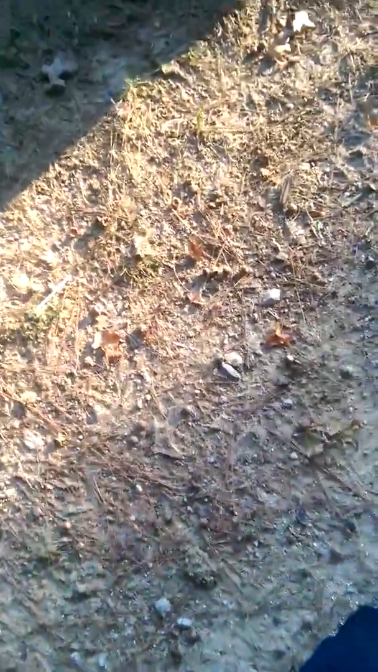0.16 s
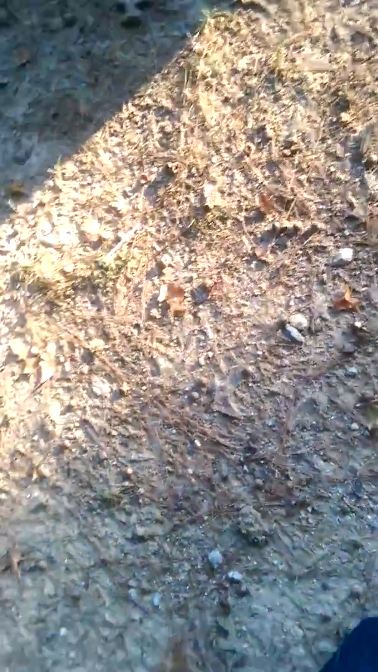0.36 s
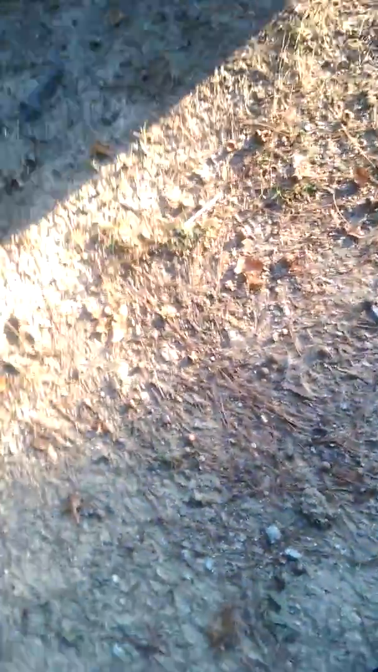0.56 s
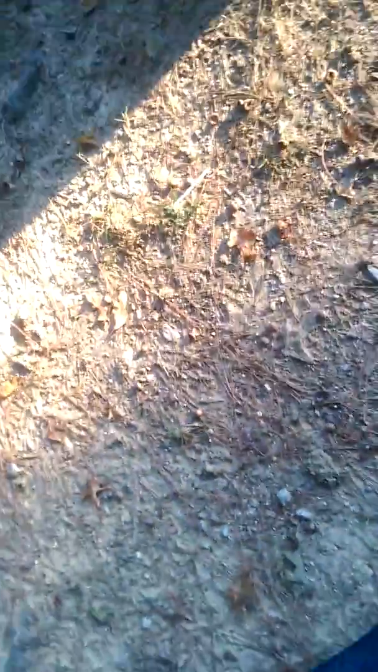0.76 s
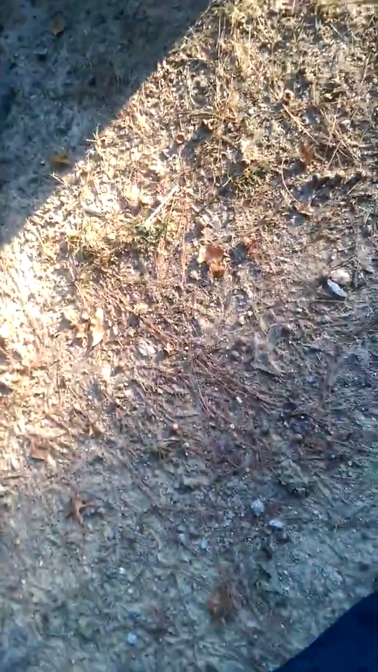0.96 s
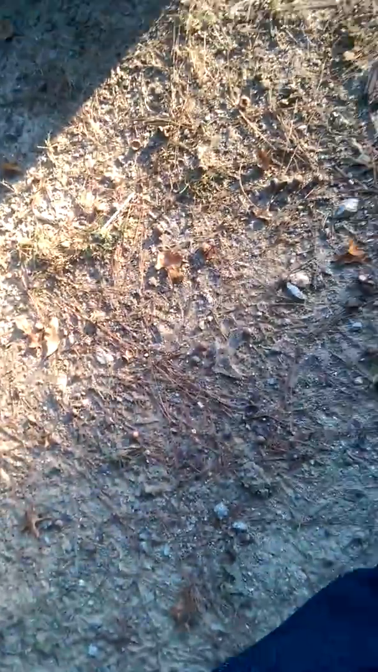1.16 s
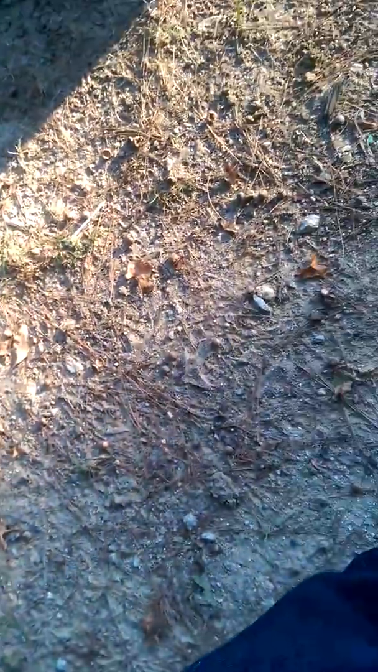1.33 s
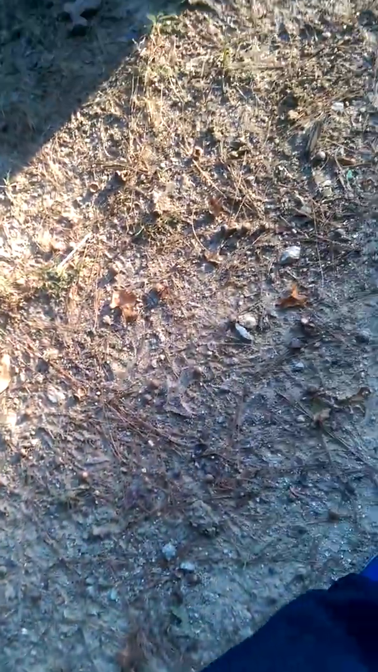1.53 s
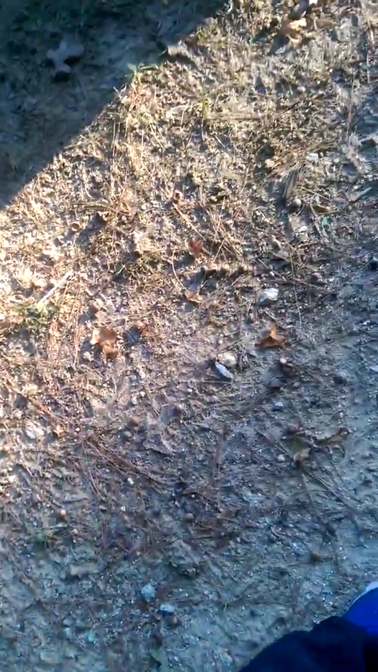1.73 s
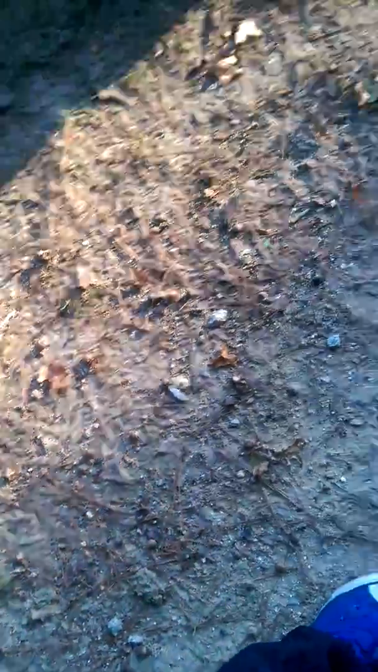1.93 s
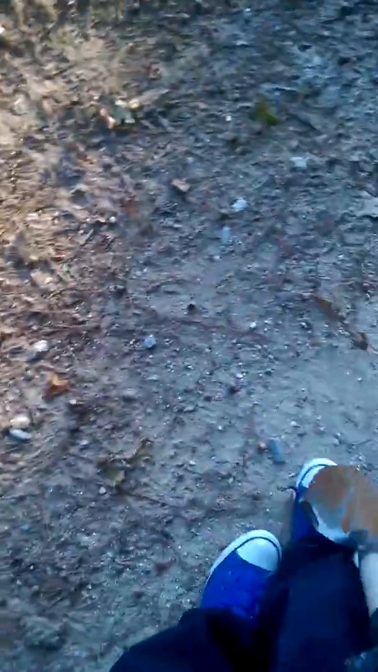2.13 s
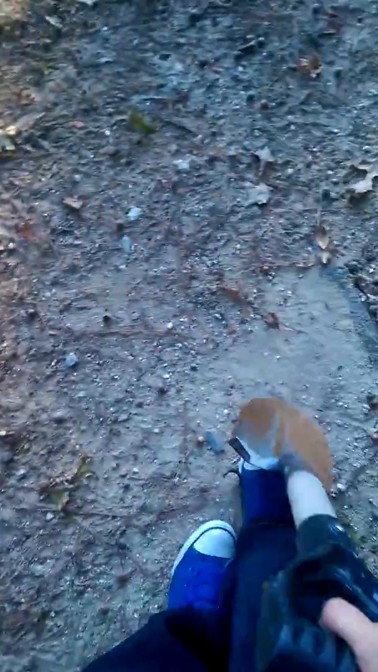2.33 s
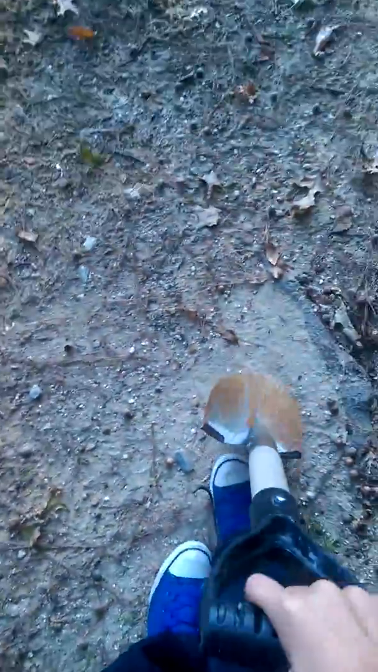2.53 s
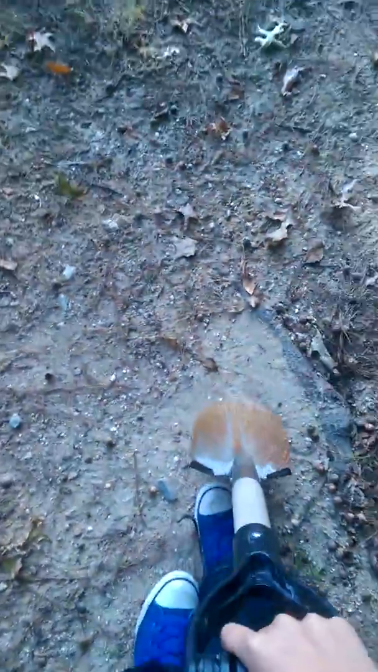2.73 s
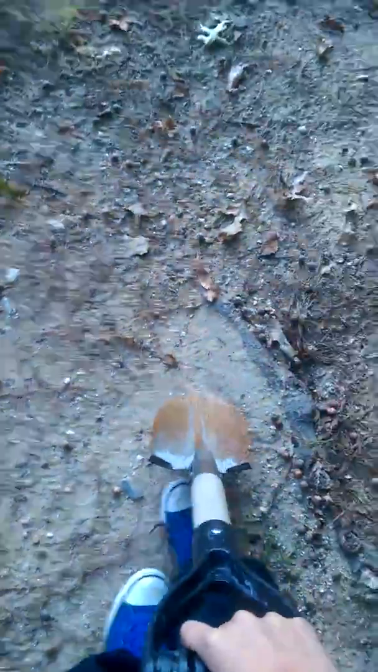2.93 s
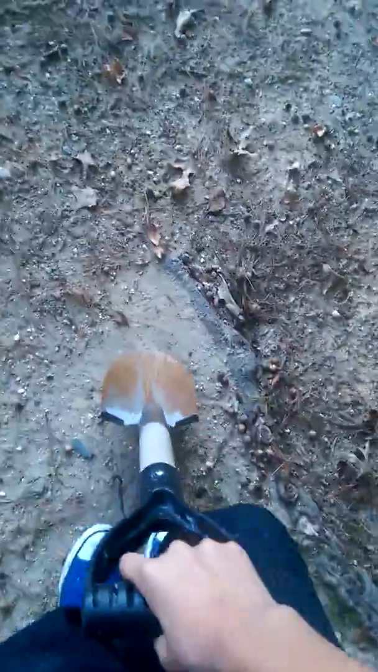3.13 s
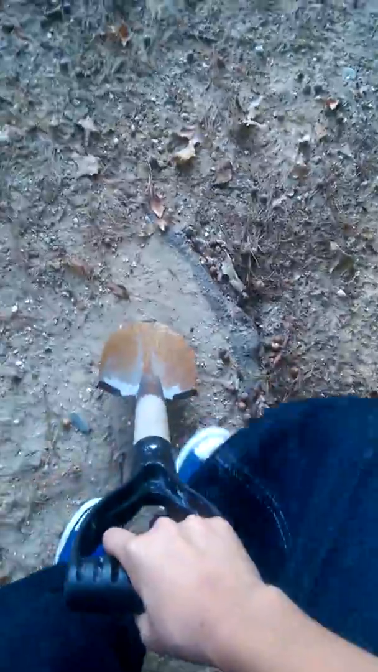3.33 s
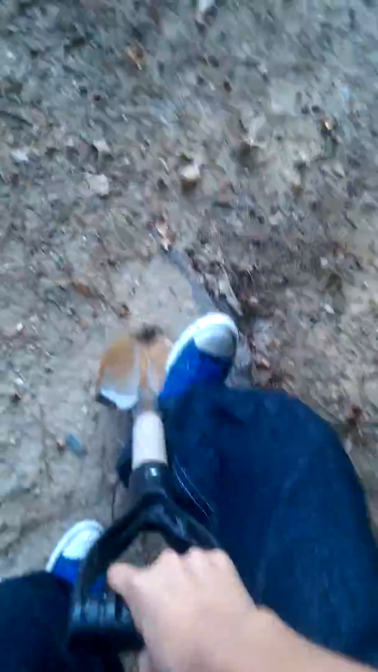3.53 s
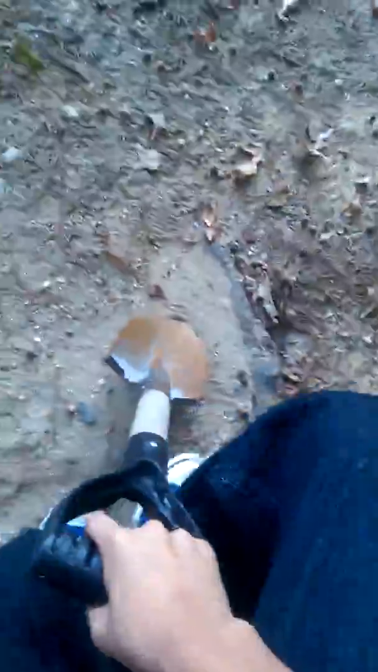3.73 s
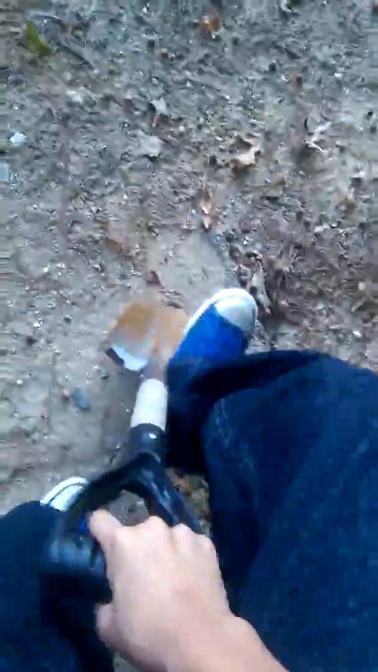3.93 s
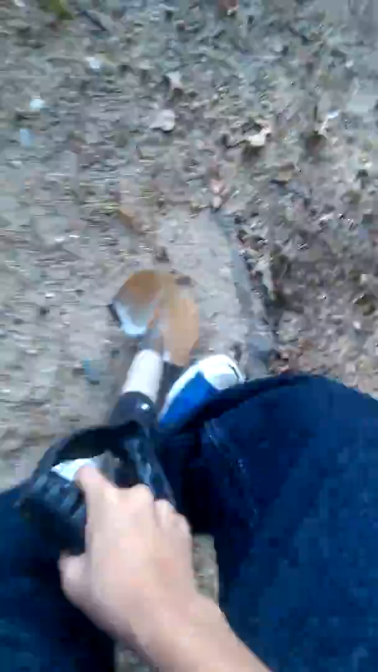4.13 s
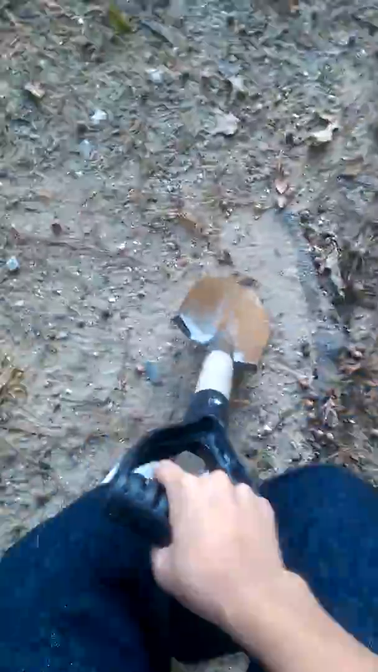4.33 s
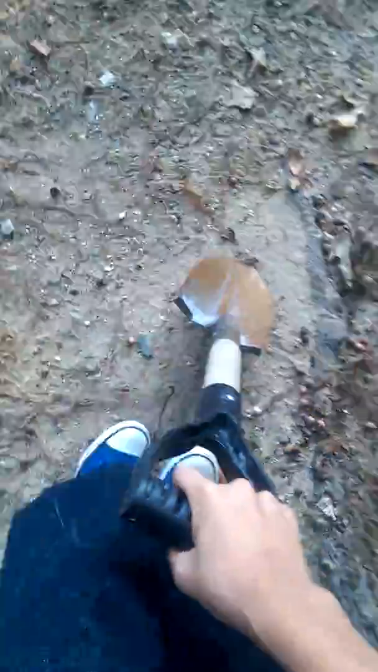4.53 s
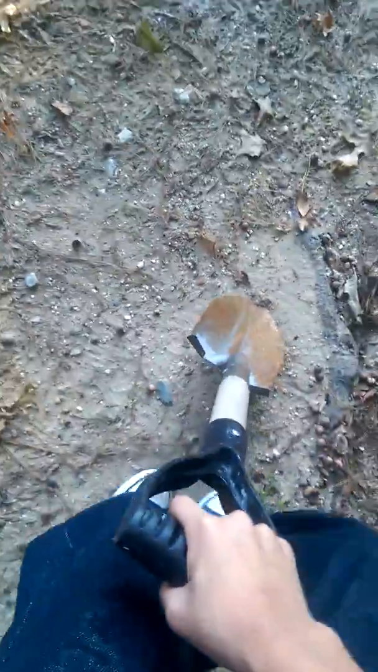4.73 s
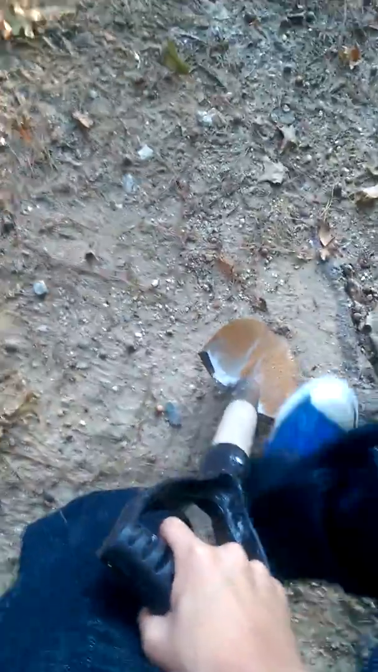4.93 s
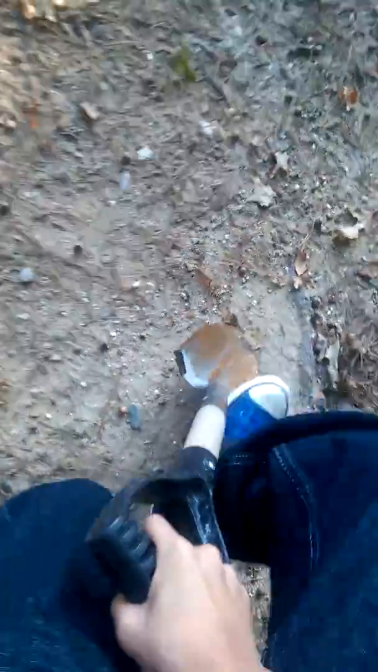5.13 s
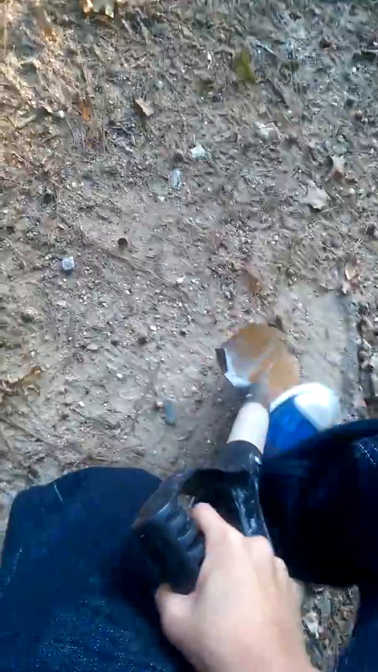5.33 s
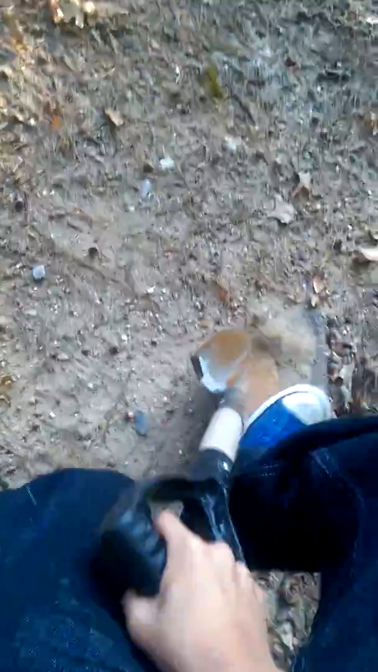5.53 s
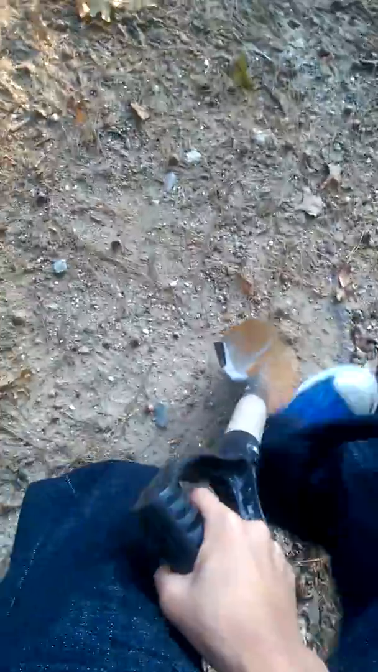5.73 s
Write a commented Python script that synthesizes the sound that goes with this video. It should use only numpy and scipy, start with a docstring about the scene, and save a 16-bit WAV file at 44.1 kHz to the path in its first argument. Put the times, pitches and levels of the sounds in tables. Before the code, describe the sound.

A low, steady distant rumble lies behind dry ticks of soles on dirt. A hand shovel is dragged over stony ground with ringing, raspy scrapes, then set on its tip and stamped five times, giving short damped crunches, soft thuds and grit grinding. Stereo, very close, the bright metal mostly left, with little yard echo.

```python
"""A low distant rumble and shoes shifting on dirt open this outdoor scene, close to a pair of microphones.
A small steel shovel is dragged up off stony dirt, its free blade skipping and ringing over pebbles.
Set on its tip, it is stamped into gravel five times; grit grinds along the buried blade between the stamps.
Random tiny impacts of grit drive damped modes of the blade; the distance is shaped noise with a hum and a drone.
The shovel's treble reaches mostly the left microphone."""
import sys
import numpy as np
from scipy import signal
from scipy.fft import rfft, irfft, next_fast_len
from scipy.io import wavfile
from scipy.ndimage import uniform_filter1d, map_coordinates

SR = 44100
rng = np.random.default_rng(int(sys.argv[2]) if len(sys.argv) > 2 else 0)


def to_wav(sig):
    """Store sig (one row per channel, or 1-D mono) as 16-bit WAV at the path in sys.argv[1].

    Samples outside -1..1 are clipped; the rate is SR.
    """
    pcm = np.clip(np.atleast_2d(sig), -1, 1) * 32767
    pcm = np.round(pcm).astype(np.int16)
    wavfile.write(sys.argv[1], SR, pcm.T)  # frames by channels


N = 258867

# colour of a blow's low knock: (frequency [Hz], relative level [dB per Hz])
KNOCK_COLOUR = [(60, -26), (150, -14), (300, 2), (500, -3), (750, 0), (1050, 4.5), (1400, -13),
                (2500, -14.5), (6000, -69)]
# low modes of the shaft and blade together: (frequency [Hz], relative level [dB], t60 [s])
SHAFT_MODES = [(382.77, -8, 0.3406), (522.11, 6, 0.10165), (679.4, 9.5, 0.0322), (976.3, 1, 0.7555),
               (2546.5, -5, 0.663)]
# the shoe stamps the blade in and it grinds on down: (time [s], crushing time [s], relative crunch level [dB],
# relative thud level [dB], sinking time from the stamp [s], relative grinding level [dB])
STAMP_BLOWS = [(3.562, 0.010803, -20.5, -33.5, 0.11831, -47.5), (4.043, 0.00518, -25, -29, 0.13661, -37.5),
               (5.069, 0.005024, -19, -31, 0.10835, -37.5), (5.477, 0.01112, -18, -32.5, 0.16571, -38.5),
               (5.834, 0.004976, -19.5, -34.5, 0.1016, -43)]


def amp(db):
    """Decibels to gain."""
    return 10 ** (np.asarray(db) / 20)


def unit(x):
    """x at rms 1."""
    return x / np.sqrt(np.mean(x ** 2) + 1e-20)


def unit_energy(x):
    """An impulse response scaled to keep the power of a white sound that passes through."""
    return x / np.sqrt(np.sum(x ** 2) + 1e-20)


def along(points, hz):
    """Interpolate (frequency [Hz], value) points on a log frequency axis."""
    f, v = np.transpose(points)
    return np.interp(np.log(hz + 1), np.log(f + 1), v)


def wobble(rate):
    """A smooth random curve, rate knots a second."""
    knots = rng.standard_normal(int(N * rate / SR) + 4)
    return map_coordinates(knots, [np.arange(N) * rate / SR])


def filtered(x, response):
    """x times a response of frequency."""
    n = x.shape[-1]
    m = next_fast_len(n + 8192)
    spectrum = rfft(x, m) * response(np.fft.rfftfreq(m, 1 / SR))
    return irfft(spectrum, m)[..., :n]


def noise(spectrum, size):
    """Coloured noise of rms 1."""
    white = rng.standard_normal(size)
    return unit(filtered(white, lambda hz: amp(along(spectrum, hz))))


def through(force, response):
    """A body's answer to a force: the force convolved with its impulse response."""
    return signal.oaconvolve(np.float32(force), np.float32(response))[:N]


def grit(rate):
    """Tiny impacts of uneven size, rate a second, evened out towards a steady mean power."""
    size_db = 5.5 * np.clip(rng.standard_normal(N), -2, 2)
    struck = rng.random(N) < rate / SR
    hits = struck * rng.choice([-1, 1], N) * amp(size_db)
    power = np.abs(uniform_filter1d(hits ** 2, size=400))
    return hits / np.sqrt(power + np.mean(power) / 20)


def blows(rows):
    """One envelope per level column: the knock lands at once, crunch and ring build up as grit is crushed."""
    # rows: (time [s], rise [s], fall [s], crunch [dB], optional knock [dB], optional ring [dB])
    envelopes = np.zeros((len(rows[0]) - 3, N))
    for s, rise, fall, *levels_db in rows:
        start = round(s * SR)
        t = np.arange(min(SR // 5, N - start)) / SR
        rise, fall = max(rise, 1e-4), max(fall, 1e-4)
        crush = np.minimum(t / rise, 1) * np.exp(-(np.maximum(t - rise, 0) / fall) ** 2)
        thump = np.minimum(t / 0.0006846, 1) * np.exp(-(t / (rise + fall)) ** 2)
        for envelope, shape, db in zip(envelopes, (crush, thump, crush), levels_db):
            envelope[start:start + len(t)] += amp(db) * shape
    return envelopes


def strokes(rows, attack_s, release_s):
    """Gain per sample from rows (time [s], length [s], level [dB]): each rises, holds and dies away."""
    t = np.arange(N) / SR
    gain = np.zeros(N)
    for s, length, db in rows:
        rise = np.clip((t - s) / attack_s, 0, 1)
        gain += amp(db) * rise * np.exp(-np.maximum(t - s - length, 0) / release_s)
    return gain


def swells(rows):
    """Gain per sample from rows (peak time [s], swell time [s], level [dB]): bell-shaped pressure."""
    t = np.arange(N) / SR
    return sum(amp(db) * np.exp(-((t - s) / width) ** 2) for s, width, db in rows)


def clack(spectrum, t60):
    """Countless damped modes, made as decaying coloured noise and heard as one short crack."""
    t = np.arange(int(SR * t60) + 64) / SR
    return unit_energy(noise(spectrum, size=len(t)) * amp(-60 * t / t60))


def ring(modes):
    """Damped sines from rows (Hz, dB, t60 s); each spot of contact excites them a little differently."""
    hz, db, t60 = np.transpose(modes)
    t = np.arange(int(SR * np.max(t60)), dtype=np.float32) / SR
    gains = amp(db + rng.normal(0, 1, len(hz)))
    # one row per mode, against time; phase in cycles
    hz, decay, phase = np.float32([hz, np.log(1000) / t60, rng.random(len(hz))])[:, :, None]
    sines = np.exp(-decay * t) * np.sin(2 * np.pi * (hz * t + phase))
    return unit_energy(gains @ sines)


def resonances(peaks):
    """The ring of rows (Hz, width Hz, dB): a wider peak dies sooner."""
    return ring([(hz, db, np.log(1000) / np.pi / width) for hz, width, db in peaks])


def together(*parts):
    """The sum of responses of unequal length."""
    size = max(map(len, parts))
    return sum(np.pad(part, (0, size - len(part))) for part in parts)


def wandering(force, response, count=5, size=160):
    """The contact jumps between a few spots, each with an answer of its own."""
    spot = np.repeat(rng.integers(count, size=N // size + 1), size)[:N]
    return sum(through(force * (spot == k), response()) for k in range(count))


def balance(pair, sides):
    """Share a sound between the two microphones, frequency by frequency."""
    return filtered(pair, lambda hz: 2 / (1 + amp([-along(sides, hz), along(sides, hz)])))


def rumble():
    """Far rumble: shaped noise, alike in both microphones in the bass only, its level drifting."""
    # colour of the distance: (frequency [Hz], relative level [dB per Hz])
    colour = [(20, -19), (35, -13), (62, 2.5), (95, -2.5), (125, -1), (180, -10), (270, -7.5), (340, -9),
              (410, -11.5), (460, -14.5), (1200, -16.5), (2200, -23.5), (5000, -34.5), (16000, -45.5)]
    # likeness of the two microphones: (frequency [Hz], correlation [0-1])
    likeness = [(100, 0.97), (400, 0.95), (900, 0.35), (2000, 0), (5000, 0.11)]

    def turn(hz):
        """Angle that divides the power between mid and side."""
        return np.arccos(np.clip(along(likeness, hz), -1, 1)) / 2

    mid = filtered(noise(colour, size=N), lambda hz: np.cos(turn(hz)))
    side = filtered(noise(colour, size=N), lambda hz: np.sin(turn(hz)))
    return amp(-45.5 + 0.51 * wobble(1.863)) * np.array([mid + side, mid - side])


def hum():
    """A far hum: each tone wavers as its sine and cosine parts drift at random."""
    # tones: (frequency [Hz], relative level [dB])
    tones = [(75, -56.5), (120.5, -56.5), (333.5, -58.5)]
    phase = 2 * np.pi * np.arange(N) / SR
    total = np.zeros(N)
    for hz, db in tones:
        wavering = wobble(9) * np.sin(hz * phase) + wobble(8.3) * np.cos(hz * phase)
        total += amp(db) * unit(wavering)
    return total


def drone():
    """A far drone: a narrow band of noise around a centre that slowly sinks in pitch."""
    start_hz, sag_hz_per_s, width_hz = 394.17, 14, 70
    centre_hz = start_hz - sag_hz_per_s * np.arange(N) / SR
    phase = 2 * np.pi * np.cumsum(centre_hz) / SR
    return amp(-55) * unit(wobble(width_hz) * np.sin(phase) + wobble(width_hz) * np.cos(phase))


def distance():
    """The far rumble, hum and drone, shared between the microphones by frequency."""
    # microphone balance for the distance: (frequency [Hz], left minus right [dB])
    far_side = [(100, 1.5), (380, 1), (900, -1.5), (2400, 2), (4400, 5.5), (8000, 11), (15000, 3.5)]
    return balance(rumble() + hum() + drone(), far_side)


def shoes():
    """Soles press sand and small stones: dry ticks with no ring."""
    # shoes shift on the dirt: (time of most pressure [s], swell time [s], relative level [dB])
    shuffles = [(.02, 0.0233, -46.5), (.095, 0.04055, -53.5), (.54, 0.0624, -54.5), (4.51, 0.02694, -50),
                (4.775, 0.0388, -50.5)]
    # small stones crack under a sole: (time [s], relative level [dB])
    pebbles = [(0.479, -42.5), (.495, -41.5), (0.5212, -32.5), (3.839, -42), (3.868, -46), (4.773, -39.5),
               (4.787, -34.5)]
    # a sole lands: (time [s], relative level [dB])
    landings = [(.546, -37), (4.476, -36)]
    # colour of sand: (frequency [Hz], relative level [dB per Hz])
    sand = [(400, 11), (1500, 7.5), (3000, -1.0), (5000, -7), (9000, 1.5), (12000, -5.5), (16000, -23)]
    step_rise_s, step_fall_s, step_crunch_db = 0.001555, 0.010268, -1
    crack_rise_s, crack_fall_s, crack_knock_db = 0.000834, 0.00353, -19
    steps = [(s, step_rise_s, step_fall_s, db + step_crunch_db, db) for s, db in landings]
    cracks = [(s, crack_rise_s, crack_fall_s, db, db + crack_knock_db) for s, db in pebbles]
    crunch, knock = blows(steps + cracks)
    force = amp(3.0) * swells(shuffles) * grit(rate=2800) + crunch * grit(rate=14000)
    ticks = wandering(force, lambda: clack(sand, t60=0.003749), count=6)
    return ticks + amp(-1) * knock * noise(KNOCK_COLOUR, size=N)


def steel(t60):
    """The free blade's ring, t60 seconds at 5 kHz; the high modes die sooner."""
    # long-ringing modes of the free blade: (frequency [Hz], relative level [dB])
    free_modes = [(991, -4.5), (1545, -3), (2223, -6.5), (2573, -5), (2850, -2), (3122, -10.5), (3391, 0),
                  (3424, 1), (3731, -9.5), (3769, -8.5), (4102, -7), (4582, -7.5), (4775, -4.5), (5223, 3),
                  (5857, -0.5), (6212, -4), (6433, 0), (6702, -11.5), (7031, -0.5), (7629, -14.5),
                  (7736, -14.5), (8376, -2.5), (8711, 3), (9737, -11.5), (10104, -16), (10411, -14),
                  (11128, -12.5), (11906, -8.5), (12843, -14.5), (13679, -14.5)]
    return ring([(hz, db, t60 * (5000 / hz) ** .35) for hz, db in free_modes])


def drag():
    """Grit rattles the loose blade: contact damps most of each ring, the rest sings on."""
    # the free blade drops and skips: (time [s], relative crunch level [dB], relative knock level [dB])
    drops = [(.599, -25.5, -25), (.708, -30.5, -40), (.764, -29.5, -45.5)]
    # the dragged blade catches on pebbles: (time [s], length [s], relative crunch level [dB])
    catches = [(.805, 0.021335, -24.5), (0.899, 0.01148, -22), (0.913, 0.014585, -21.5),
               (1.008, 0.03432, -27.5), (1.047, 0.01435, -20.5), (1.077, 0.02296, -24.5),
               (1.123, 0.01111, -22.5), (1.159, 0.01272, -26.5), (1.196, 0.02602, -26),
               (1.4, 0.00928, -31.5), (1.471, 0.0129, -34), (1.579, 0.00636, -35.5), (1.804, 0.03446, -25),
               (1.953, 0.02111, -41.5), (2.091, 0.01025, -39.5)]
    # pulls of the blade over the ground: (time [s], length [s], relative level [dB])
    pulls = [(.82, 0.0887, -39.5), (.895, 0.07826, -32.5), (1.015, 0.1094, -29.5), (1.16, 0.33084, -32.5),
             (1.555, 0.05147, -38), (1.75, 0.02721, -46), (1.81, 0.09812, -40.5), (2.04, 0.09355, -52)]
    # colour of stone on steel: (frequency [Hz], relative level [dB per Hz])
    rasp = [(300, -46), (700, -3), (1500, 0.5), (2400, -0.5), (3500, 1.5), (6000, -3.5), (9000, 7.5),
            (12500, 2.5), (14500, -9.5), (16000, -26.5)]
    # blade resonances while its edge rubs on the ground: (frequency [Hz], width [Hz], relative level [dB])
    rubbed = [(1531.5, 39.14, -2), (2437.3, 131.6, -6), (3439.4, 140.7, 6), (3727.1, 92.2, -1.5),
              (4602.4, 54.8, -4), (5277.5, 33.67, -1), (6619.8, 214, 0.5), (7069.3, 133.6, -0.5),
              (7618.5, 92.94, 5.5), (8718.9, 82.5, 11), (9849, 150.2, 8.5), (10237, 202.4, 6.5),
              (10986, 92, 5.5), (11963, 106.6, 7.5), (12514, 133.6, 4.5), (13878, 105.4, -0.5),
              (14616, 65.9, -5.5)]
    skip_rise_s, skip_fall_s = 0.0005645, 0.00622
    rise_share, snag_knock_db = 0.1861, -30  # part of a snag spent building up; its knock against its crunch

    skips = [(s, skip_rise_s, skip_fall_s, db, knock_db) for s, db, knock_db in drops]
    snags = [(s, rise_share * length, (1 - rise_share) * length, db, db + snag_knock_db)
             for s, length, db in catches]
    crunch, knock = blows(skips + snags)
    roughness = unit(amp(1.791 * wobble(140) + 0.753 * wobble(50.638)))
    friction = strokes(pulls, attack_s=0.0061, release_s=0.02152) * roughness
    force = amp(-.5) * friction * grit(rate=3500) + amp(0.5) * crunch * grit(rate=5000)

    def blade():
        """The damped answer of one spot of contact."""
        return together(amp(-7.5) * clack(rasp, t60=.005), amp(-2.7) * resonances(rubbed))

    # clear modes over many weaker ones
    singing = amp(-8.5) * through(force, steel(t60=0.15427))
    singing += amp(-16.5) * through(force, clack(rasp, t60=0.0713))
    # the sudden start of a knock sets the whole tool ringing
    boom = amp(26.5) * through(np.gradient(knock), ring(SHAFT_MODES))
    low_knock = amp(3.0) * knock * noise(KNOCK_COLOUR, size=N)
    return wandering(force, blade, count=5) + singing + low_knock + boom


def grinding():
    """Friction on the buried blade: it sinks after each stamp, yields to leaning, and soil trickles past."""
    # weight leaned on the standing blade: (time of most pressure [s], swell time [s], relative level [dB])
    leans = [(3.26, 0.05745, -55.5), (3.348, 0.02551, -33.5), (3.46, 0.05934, -60), (4.95, 0.03902, -60),
             (5.8, 0.019966, -46.5)]
    stall_s = 0.03919  # the blade sticks for a moment before it sinks
    attack_s, release_s = 0.04634, 0.01177
    sinks = [(s + stall_s, length - stall_s, db) for s, *_, length, db in STAMP_BLOWS]
    sinking = strokes(sinks, attack_s, release_s)
    # loosened soil keeps trickling from 3.2 s, for 3.7 s at most
    trickle = strokes([(3.2, 3.7, -66.5)], attack_s, release_s) * amp(5 * wobble(60))
    return sinking + swells(leans) + trickle


def dig():
    """The blade crushes gravel; soil grips and damps it, so stamps, jolts and grinding ring it only briefly."""
    # the upright blade is set down or jolts past a stone:
    # (time [s], relative crunch level [dB], relative ring level [dB])
    stone_jolts = [(2.674, -32.5, -51), (2.707, -44.5, -52.5), (3.636, -28.5, -35), (4.164, -23.5, -38),
                   (5.096, -29.5, -53.5), (5.146, -31.5, -40), (5.192, -31.5, -35), (5.681, -37.5, -56.5),
                   (5.791, -46, -69)]
    # colour of crushed gravel: (frequency [Hz], relative level [dB per Hz])
    gravel = [(300, -22), (800, -8), (1700, -3), (2700, -3), (3600, 0), (4500, -4), (6000, -1), (10000, -1),
              (12000, -3), (13500, -9), (16000, -12)]
    # blade resonances when soil grips it: (frequency [Hz], width [Hz], relative level [dB])
    gripped = [(1658.8, 42.08, 7), (3521, 29.03, -7), (5140, 54.1, -4.5), (5527.4, 70.7, 10.5),
               (6356, 41, -4), (6501.5, 464.4, 23.5), (8300, 130, -35), (8155, 110, -20), (8657, 466, -2.5),
               (9413, 131.2, 14.5), (10297, 57.4, 3.5), (10134, 63.56, 9), (10810, 57, -31),
               (11758, 157.9, 19.5), (12250, 46.9, 7), (14080, 290, -5)]
    # modes of the blade standing on its tip: (frequency [Hz], relative level [dB], t60 [s])
    upright = [(1034.7, -9, 0.205), (1654.2, 2.5, 0.1054), (2570, -5, 0.1045), (3160.4, -10, 0.109),
               (3359.7, -3, 0.1376), (3530.3, -5, 0.0465), (5352.3, -4, 0.1131), (5720, -20, 0.109),
               (7172.1, 3, 0.06947), (7525.4, 6.5, 0.04675), (8702.8, 10.5, 0.04866), (11460, -15, 0.0697)]
    # colour of the shoe's thud on the blade's step: (frequency [Hz], relative level [dB per Hz])
    thud_colour = [(60, -1.5), (150, -4), (300, -2.5), (520, -1), (750, -4), (1050, -1.5), (1400, -25.5),
                   (2500, -9), (6000, -56.5)]
    stamp_fall_s, stamp_ring_db = 0.012373, -19.5  # the ring is given against the crunch
    jolt_rise_s, jolt_fall_s, jolt_knock_db = 0.002774, 0.006188, 1  # the knock is given against the ring

    stamps = [(s, rise, stamp_fall_s, db, thud_db, db + stamp_ring_db)
              for s, rise, db, thud_db, *_ in STAMP_BLOWS]
    jolts = [(s, jolt_rise_s, jolt_fall_s, db, ring_db + jolt_knock_db, ring_db)
             for s, db, ring_db in stone_jolts]
    crunch, knock, ringing = blows(stamps + jolts)
    roughness = unit(amp(2.42 * wobble(130)))
    friction = amp(-1.0) * grinding() * roughness * grit(rate=3000)
    stones = grit(rate=4900)

    def blade():
        """The gripped answer of one spot of contact."""
        return together(amp(-2) * clack(gravel, t60=.005), amp(-5) * resonances(gripped))

    singing = through(amp(-5.5) * friction + amp(7.0) * ringing * stones, ring(upright))
    thud = knock * noise(thud_colour, size=N)
    boom = amp(15.5) * through(np.gradient(knock), ring(SHAFT_MODES))
    return wandering(friction + amp(1.0) * crunch * stones, blade, count=5) + singing + thud + boom


def handle():
    """A short click of the hollow plastic grip as the hand takes hold."""
    # the handle clicks: (time [s], rise [s], fall [s], relative level [dB])
    clicks = [(3.222, 0.000994, 0.006186, -41.5)]
    plastic = [(1390, 237, -1), (2308.5, 317, -6), (3143.6, 261, 2)]  # (frequency [Hz], width [Hz], level [dB])
    return through(blows(clicks)[0] * grit(rate=8200), resonances(plastic))


def yard(x, lag_s, echo_db, t60):
    """The sound reaches the left microphone first; the yard scatters a faint tail."""
    # microphone balance for the nearby sounds: (frequency [Hz], left minus right [dB])
    near_side = [(200, 1.5), (700, 0.5), (1300, 0), (2400, 14.5), (4400, 17), (6000, 26), (8000, 37.5),
                 (15000, 31.5)]
    # half the lag forward on the left, half back on the right
    direct = filtered(x, lambda hz: np.exp(np.pi * 1j * hz * lag_s * np.array([[1], [-1]])))
    scatter = [(200, -10), (3000, 10), (15000, -2)]  # (frequency [Hz], relative level [dB per Hz])
    tail = np.array([through(x, clack(scatter, t60)) for side in range(2)])
    return balance(direct + amp(echo_db) * tail, near_side)


def scene():
    """Shovel and shoes close by, the distance behind them."""
    close = shoes() + drag() + dig() + handle()
    return distance() + yard(close, lag_s=0.00019113, echo_db=-15.0, t60=0.13435)


def record(dry):
    """The recorder keeps next to nothing above its band limit."""
    top_hz = 15900
    return filtered(dry, lambda hz: 1 / np.sqrt(1 + (hz / top_hz) ** 160))


dry = scene()
out = record(dry)
to_wav(out)
```